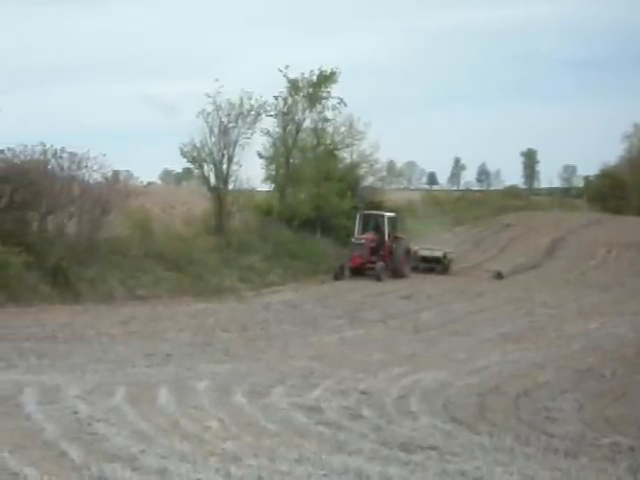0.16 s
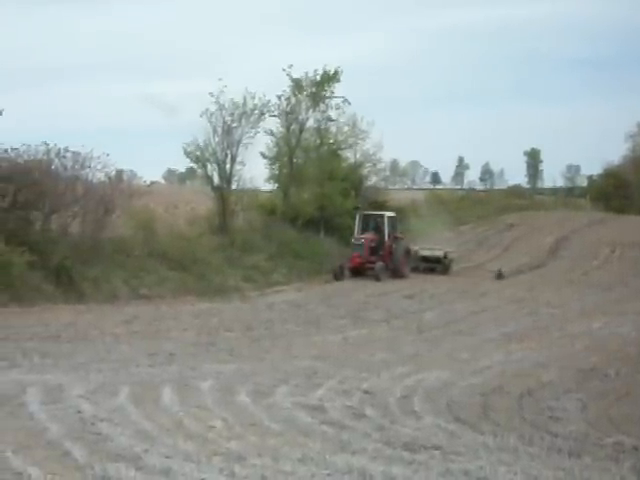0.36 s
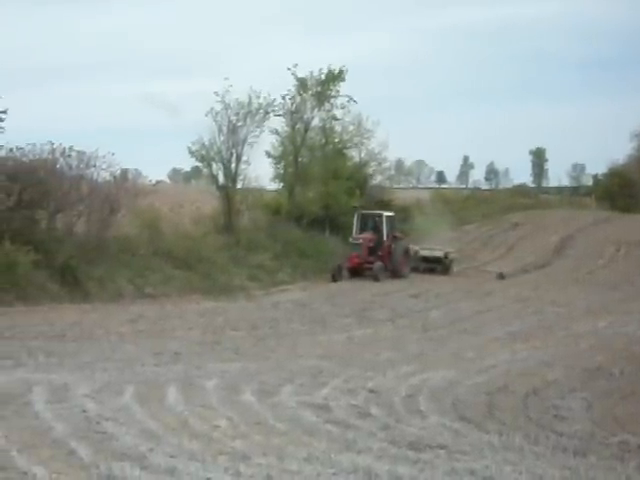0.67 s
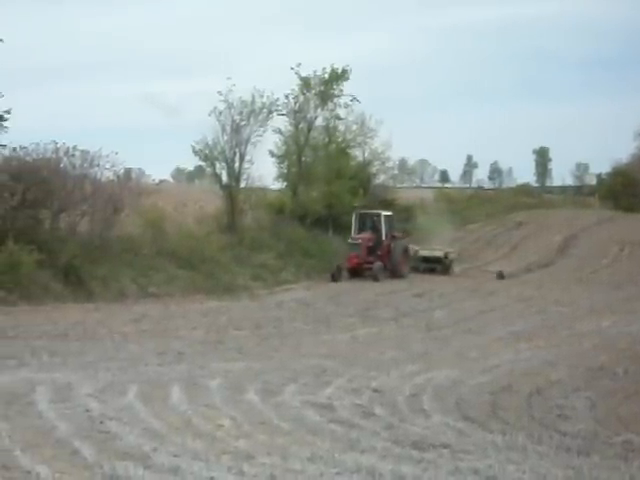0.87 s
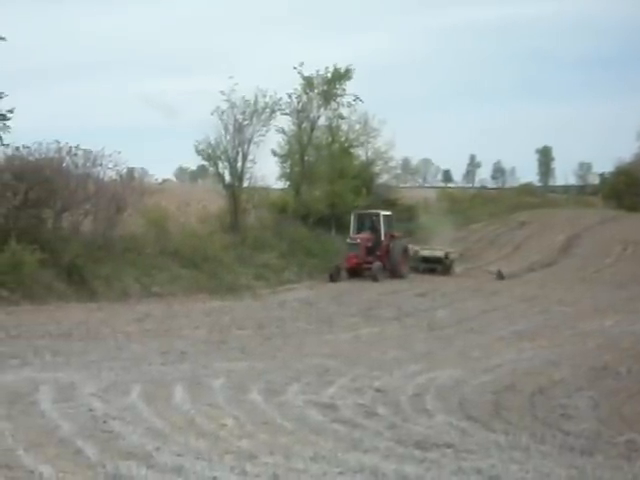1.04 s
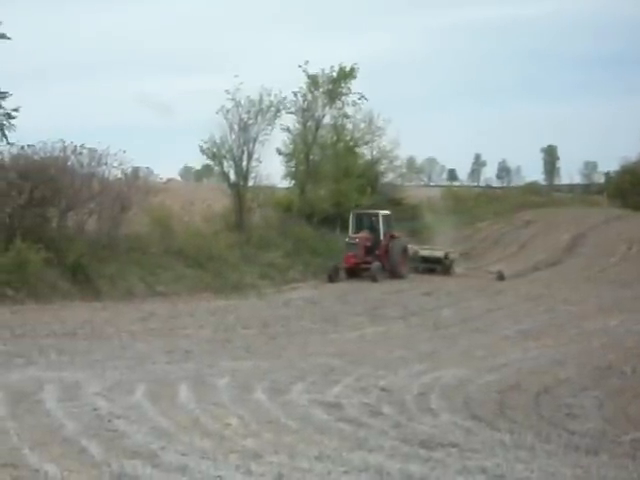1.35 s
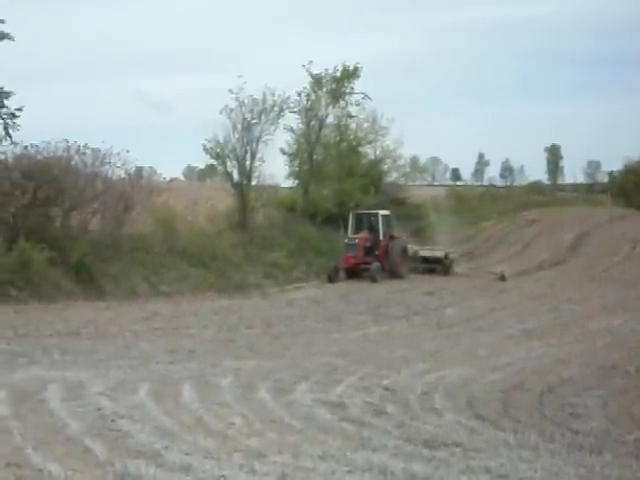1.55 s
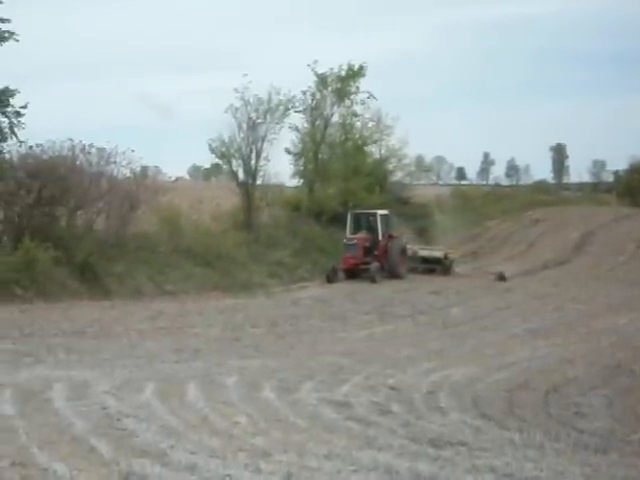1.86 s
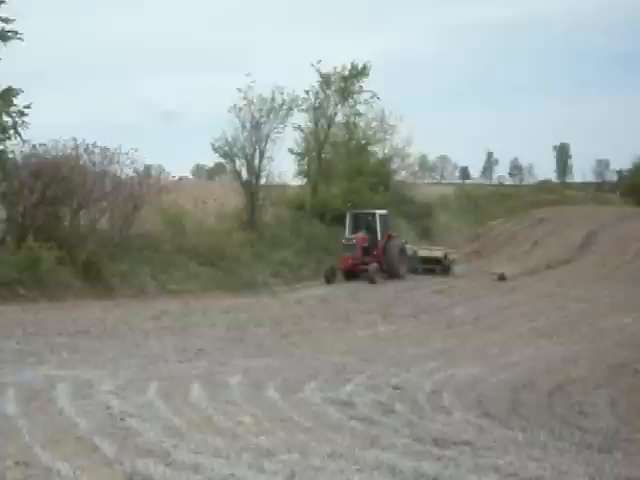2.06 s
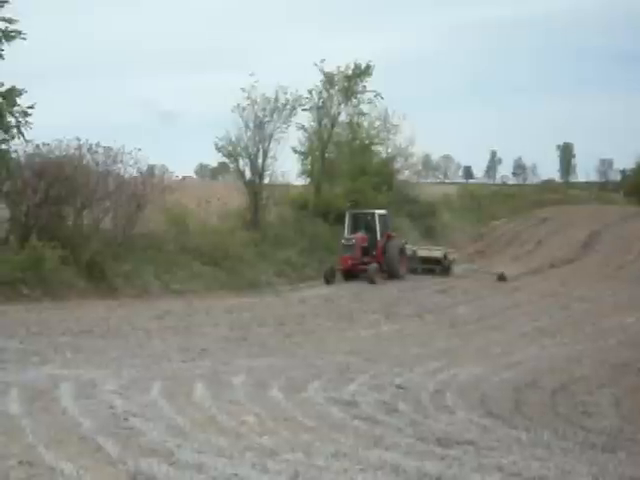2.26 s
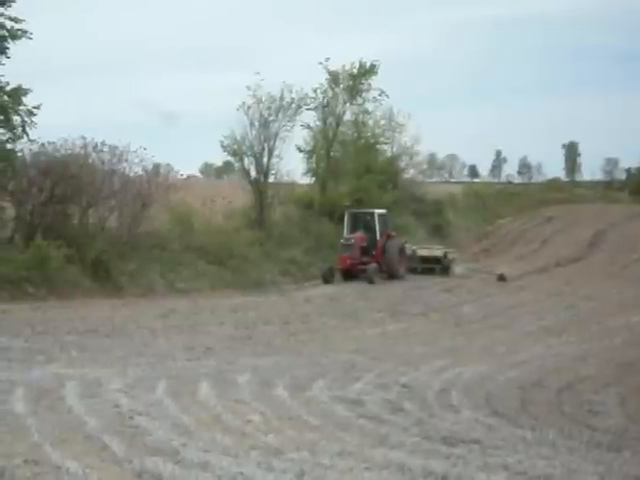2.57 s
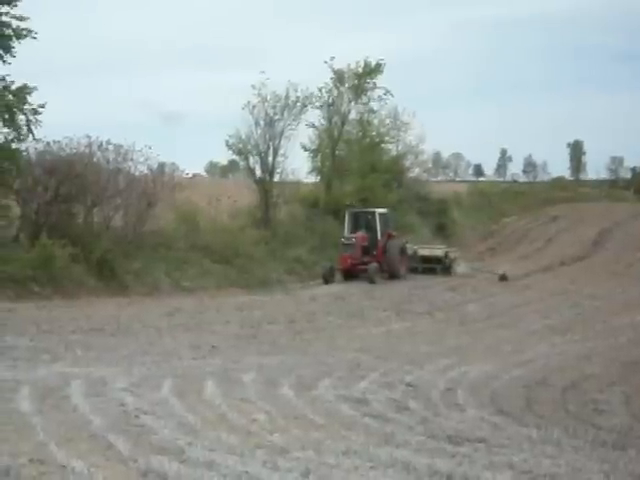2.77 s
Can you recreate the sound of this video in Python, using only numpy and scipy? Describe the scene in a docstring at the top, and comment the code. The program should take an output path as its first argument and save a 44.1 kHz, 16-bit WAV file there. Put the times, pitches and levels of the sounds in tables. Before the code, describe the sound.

A distant tractor drones steadily with a diesel-like clatter and a light whine, towing a planter that rattles through the soil. A bird gives a short high chirp midway, and wind buffets the small, dull-sounding microphone, more toward the end.

```python
"""Tractor planting a distant field

A six-cylinder tractor holds a steady speed: the engine clatters in a repeating cycle over the drone
and rush of the exhaust, fan and gears whine, and one panel sings. The planter rattles through the
soil behind it. A bird chirps, and wind buffets the mono microphone of a small camera, whose fast
limiter reins in the peaks."""
import sys
import numpy as np
from scipy import signal
from scipy.fft import rfft, irfft
from scipy.io import wavfile
from scipy.ndimage import uniform_filter1d, map_coordinates

SR = 44100
rng = np.random.default_rng(int(sys.argv[2]) if len(sys.argv) > 2 else 0)


def output_pcm(signal):
    """Save a mono or channel-first signal as 16-bit PCM at the path in sys.argv[1].

    Samples are clipped to [-1, 1] before scaling.
    """
    pcm = np.clip(np.atleast_2d(signal).T, -1, 1) * 32767
    wavfile.write(sys.argv[1], SR, np.round(pcm).astype(np.int16))


N = 128772
TIME, FREQS = np.arange(N) / SR, np.fft.rfftfreq(N, 1 / SR)
FIRING_HZ, CYLINDERS = 103.01, 6

# accent on each firing of the engine cycle (gain [dB])
FIRING_ACCENTS = [0.33, 0.33, 1.1, -0.82, 0.13, -2.2]
# tone colour of the clatter (frequency [Hz], relative level [dB])
CLATTER_EQ = [(500, -16.5), (800, -10), (1000, -9.5), (1190, -6), (1250, -1.5), (1650, -1), (2000, 0),
              (2600, -2), (3200, -5), (4600, -6.5), (5500, -19.5)]
# resonances of block and panels (frequency [Hz], width [Hz], gain [dB])
PANEL_RESONANCES = [(1291, 28, 7), (1406, 26, 6), (1461, 28, 6), (1542, 20, 6), (1810, 70, 3),
                    (1872, 22, 4), (1927, 18, 5), (1966, 20, 5), (2062, 22, 5), (2125, 35, -6),
                    (2180, 28, 5), (2247, 32, 6), (2402, 40, 5)]
# fader ride on the clatter (time [s], level [dB])
CLATTER_RIDE = [(0, -15), (1.0, -15.5), (1.5, -16.5), (2.2, -16), (2.9, -16)]
# partials of the exhaust drone (harmonic [multiple of the cycle rate], level [dB])
EXHAUST_PARTIALS = [(3, -43.5), (4, -42.5), (5, -36), (6, -22), (7, -35.5), (8, -37.5), (9, -39),
                    (10, -41.5), (12, -36), (13, -42), (14, -48), (15, -53), (16, -41), (17, -42),
                    (18, -44), (25, -44), (26, -44.5), (30, -46.5), (33, -41.5)]
# tone colour of the exhaust's rush (frequency [Hz], relative level [dB])
RUSH_EQ = [(100, -3), (200, -2.5), (245, 3.5), (290, 0.5), (350, -6.5), (410, -5.5), (560, -0.5),
           (780, -6.5), (950, -1), (1400, -17.5)]
# fader ride on the rush (time [s], level [dB])
RUSH_RIDE = [(0, -28.5), (.8, -29), (1.5, -27.5), (2.0, -25.5), (2.4, -26), (2.9, -23.5)]
# fan and gear tones (pitch [Hz], level [dB], flutter depth [0-1])
WHINE_TONES = [(187.7, -25.5, 0.23), (966, -45, 0), (1075, -40, 0), (1133.2, -31, 0.06)]
# fader ride on the singing panel (time [s], level [dB])
SING_RIDE = [(0, -25), (1.1, -30.5), (1.6, -28.5), (2.9, -36)]
# tone colour of the planter's rattle (frequency [Hz], relative level [dB])
RATTLE_EQ = [(500, -22.5), (1500, -21), (2800, -5.5), (3800, -2), (4600, -2), (5000, -3.5), (5500, -13.5)]
# fader ride on the rattle (time [s], level [dB])
RATTLE_RIDE = [(0, -21.5), (.6, -22), (1.05, -18.5), (1.3, -23.5), (1.55, -28.5), (1.9, -26.5), (2.3, -23),
               (2.55, -25.5), (2.9, -28.5)]
# tone colour of the wind bed (frequency [Hz], relative level [dB])
WIND_EQ = [(8, -5), (25, -3.5), (50, -3.5), (80, -16), (130, -11), (200, -18), (300, -22), (600, -41.5),
           (1500, -58.5)]
# fader ride on the wind bed (time [s], level [dB])
WIND_RIDE = [(0, -37.5), (.3, -26), (.55, -15.5), (.7, -34.5), (.87, -18.5), (1.15, -22), (1.4, -24),
             (1.7, -28), (1.9, -16.5), (2.15, -20), (2.5, -18), (2.7, -23.5), (2.92, -17.5)]
# gusts on the microphone (centre time [s], length [s], level [dB], upper edge [Hz])
WIND_GUSTS = [(0.369, 0.032, -14, 85), (0.473, 0.066, -17, 50), (1.245, 0.038, -12.5, 54.4),
              (1.809, 0.027, -16.5, 50), (2.008, 0.032, -13, 65), (2.059, 0.021, -10, 120),
              (2.129, 0.11, -14, 53.8), (2.212, 0.089, -23, 197), (2.26, 0.043, -11, 59.1),
              (2.294, 0.055, -7.5, 110), (2.411, 0.045, -14.5, 84), (2.631, 0.042, -14, 70),
              (2.873, .05, -8, 190)]
# bird notes (time [s], length [s], start pitch [Hz], end pitch [Hz], level [dB], rasp [0-1])
BIRD_NOTES = [(.095, .026, 5400, 5350, -26, .15), (.634, .032, 3400, 3520, -22, .15),
              (1.63, .022, 3000, 3250, -22, .6), (1.663, .016, 5350, 5020, -16.5, .2),
              (1.668, .022, 4950, 4680, -19, .25), (1.664, .02, 3250, 2950, -20, .3),
              (1.735, .013, 3500, 3700, -19, .1), (1.741, .032, 4150, 4200, -6, .02),
              (1.77, .018, 4600, 4900, -20, .3), (2.036, .055, 4500, 4550, -20.5, .02),
              (2.814, .034, 4780, 4820, -25.5, .05)]
# treble roll-off of the camera (frequency [Hz], gain [dB])
CAMERA_EQ = [(0, 0.5), (4700, -2.5), (5500, -2), (6000, -12.5), (6400, -22.5), (6800, -36.5), (7100, -47.5),
             (7400, -67)]


def amp(db):
    """Decibels to gain."""
    return 10 ** (np.asarray(db) / 20)


def unit(x):
    """Scales to an rms of one."""
    return x / np.sqrt(np.mean(x ** 2) + 1e-20)


def fader(ride):
    """Gain over time from a fader ride."""
    return amp(np.interp(TIME, *np.transpose(ride)))


def colour(x, eq, lift_db=0):
    """Shapes a sound with an EQ curve, at an rms of one."""
    hz, db = np.transpose(eq)
    curve_db = np.interp(np.log(FREQS + 1), np.log(hz + 1), db)
    return unit(irfft(rfft(x) * amp(curve_db + lift_db), N))


def drift(hz):
    """Random motion, mostly slower than hz, at an rms of one."""
    return unit(irfft(rfft(rng.standard_normal(N)) / (1 + (FREQS / hz) ** 4) * (FREQS > 0), N))


def tone(turns, flutter):
    """A sine whose strength flutters in the moving air."""
    return np.sqrt(2) * np.cos(2 * np.pi * (turns + rng.random())) * (1 + flutter * drift(hz=4.2))


def engine_clatter(cycles, decay_s=.01, floor=1.1):
    """Each firing knocks on the block and rings the panels; part of the noise loops with every cycle."""
    period = round(SR * CYLINDERS / FIRING_HZ)
    pattern = unit(irfft(np.exp(2j * np.pi * rng.random(period // 2 + 1)), period))
    loop = map_coordinates(pattern, [cycles % 1 * period], order=3, mode="grid-wrap")
    firings = cycles * CYLINDERS
    accents = amp(FIRING_ACCENTS)[firings.astype(int) % CYLINDERS]
    since_firing_s = firings % 1 / FIRING_HZ
    knocks = accents * (floor + np.exp(-since_firing_s / decay_s))
    loop_share = .67 / (1 + (FREQS / 2300) ** 4)  # the top end repeats least
    looped = np.sqrt(loop_share) * rfft(loop * knocks)
    fresh = np.sqrt(1 - loop_share) * rfft(rng.standard_normal(N) * knocks)
    ring_db = sum(db / (1 + (2 * (FREQS - hz) / width) ** 2) for hz, width, db in PANEL_RESONANCES)
    return colour(irfft(looped + fresh, N), CLATTER_EQ, ring_db) * fader(CLATTER_RIDE)


def exhaust_drone(cycles, flutter=.16):
    """Harmonics of the engine cycle; those of the firing rate line up into one pulse per firing."""
    pulses = sum(-np.sqrt(2) * amp(db) * np.cos(2 * np.pi * k * cycles)
                 for k, db in EXHAUST_PARTIALS if k % CYLINDERS == 0)
    burble = sum(amp(db) * tone(k * cycles, flutter) for k, db in EXHAUST_PARTIALS if k % CYLINDERS)
    return pulses * (1 + flutter * drift(hz=32)) + burble


def exhaust_rush():
    """Gas rushes from the stack as a breathy low-mid noise."""
    return colour(rng.standard_normal(N), RUSH_EQ) * fader(RUSH_RIDE)


def fan_and_gears(cycles):
    """Fan and gears whine at pitches that track the engine speed."""
    engine_time = cycles * CYLINDERS / FIRING_HZ
    return sum(amp(db) * tone(hz * engine_time, flutter) for hz, db, flutter in WHINE_TONES)


def singing_panel(pitch_hz=1801, half_width_hz=25):
    """One panel rings in a narrow, wavering band."""
    phase = 2 * np.pi * pitch_hz * TIME
    ring = drift(half_width_hz) * np.cos(phase) + drift(half_width_hz) * np.sin(phase)
    return ring * fader(SING_RIDE)


def planter(clinks_per_s=350, decay_s=.0049, clink_share=.4):
    """Discs scrape through the soil while chains and linkage clink."""
    t, clinks = np.arange(0, .04, 1 / SR), np.zeros(N)
    pitches = np.geomspace(2400, 5400, num=24)
    for hz in pitches:
        hits = rng.random(N) < clinks_per_s / len(pitches) / SR
        accents = amp(.5 * np.minimum(rng.exponential(1, N), 4))
        ping = np.exp(-t / decay_s) * np.sin(2 * np.pi * hz * t)
        clinks += signal.oaconvolve(hits * accents, ping)[:N]
    scrape = rng.standard_normal(N) * amp(.43 * drift(hz=40))
    metal = np.sqrt(clink_share) * colour(clinks, RATTLE_EQ)
    soil = np.sqrt(1 - clink_share) * colour(scrape, RATTLE_EQ)
    return (metal + soil) * fader(RATTLE_RIDE)


def wind(push_share=.3):
    """A bed of rumble on the microphone; each gust is a push of pressure inside a puff of turbulence."""
    out = colour(rng.standard_normal(N), WIND_EQ) * fader(WIND_RIDE)
    for centre, length, db, edge_hz in WIND_GUSTS:
        swell = np.exp(-(2 * (TIME - centre) / length) ** 2)
        puff = swell * drift(edge_hz)
        push_time = (TIME - centre) * edge_hz * np.pi / 2
        push = (1 - 2 * push_time ** 2) * np.exp(-push_time ** 2)
        gust = np.sqrt(1 - push_share) * unit(puff) + np.sqrt(push_share) * unit(push)
        out += amp(db) * np.sqrt(np.mean(swell ** 2)) * gust
    return out


def bird(trill_hz=150, trill_depth=.2, swing_hz=50, rasp_hz=350):
    """Short gliding whistles with a fast trill; some have a raspy edge."""
    out = np.zeros(N)
    rasp = (drift(rasp_hz) + 1j * drift(rasp_hz)) / np.sqrt(2)
    for onset, length, start_hz, end_hz, db, rough in BIRD_NOTES:
        t = np.arange(0, length, 1 / SR)
        trill = np.sin(2 * np.pi * trill_hz * t)
        hz = start_hz + (end_hz - start_hz) * t / length + swing_hz * trill
        envelope = np.sin(np.pi * t / length) * (1 + trill_depth * trill)
        grain = np.sqrt(1 - rough) + np.sqrt(rough) * np.interp(onset + t, TIME, rasp)
        voice = grain * np.exp(2j * np.pi * np.cumsum(hz) / SR)
        start = round(onset * SR)
        out[start:start + len(t)] += amp(db) * envelope * unit(voice.real)
    return out


def scene():
    """One gently wandering engine speed locks drone, whine and clatter together; the mix is dual mono."""
    speed = 1 + .0022 * drift(hz=3.24)
    cycles = np.cumsum(speed) * FIRING_HZ / CYLINDERS / SR
    exhaust = exhaust_drone(cycles) + exhaust_rush()
    tractor = exhaust + fan_and_gears(cycles) + engine_clatter(cycles) + singing_panel()
    mono = tractor + planter() + wind() + bird()
    return np.array([mono, mono])


def record(dry):
    """The camera's lo-fi sound: a fast limiter, a low sample rate that mirrors the treble, a dull top."""
    threshold_db, slope, window_s, release_db_per_s = -11.5, .71, .0047, 254.5
    camera_hz, cutoff_hz = 11025, 7160
    power_db = 10 * np.log10(abs(uniform_filter1d(dry[0] ** 2, int(window_s * SR))) + 1e-12)
    release = TIME * release_db_per_s
    detector_db = np.maximum.accumulate(power_db + release) - release
    over_db = np.maximum(detector_db - threshold_db, 0)
    limited = dry * amp(-slope * uniform_filter1d(over_db, size=100))
    narrow = irfft(rfft(limited) * (FREQS < camera_hz / 2), N)
    step = round(SR / camera_hz)
    mirrored = narrow * step * (np.arange(N) % step == 0)
    dulled = irfft(rfft(mirrored) * amp(np.interp(FREQS, *np.transpose(CAMERA_EQ))), N)
    high_cut = signal.firwin(511, cutoff_hz, window=("kaiser", 9), fs=SR)
    return signal.oaconvolve(dulled, high_cut[None], "same")


dry = scene()
out = record(dry)
output_pcm(out)
```